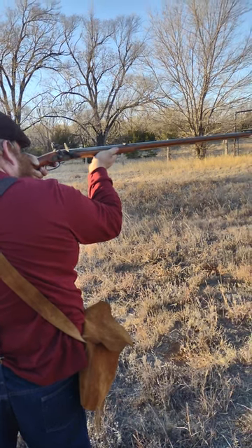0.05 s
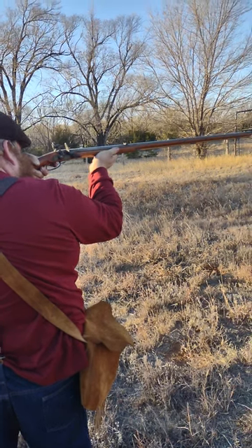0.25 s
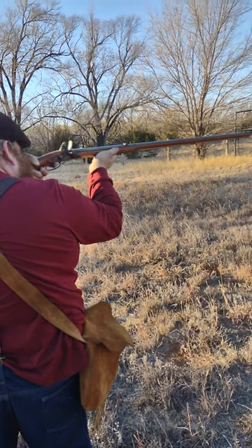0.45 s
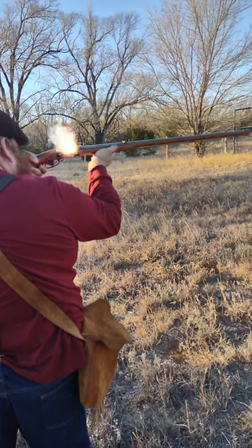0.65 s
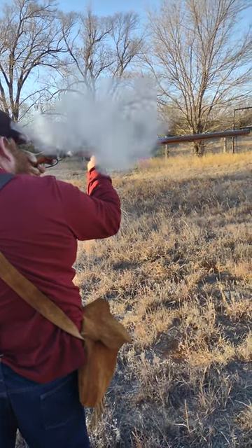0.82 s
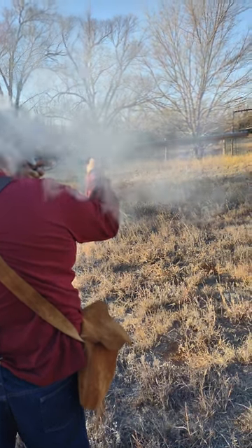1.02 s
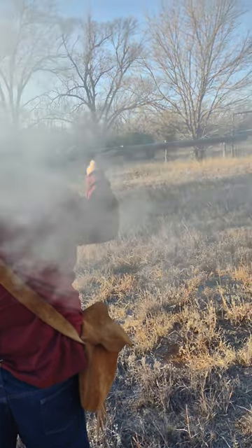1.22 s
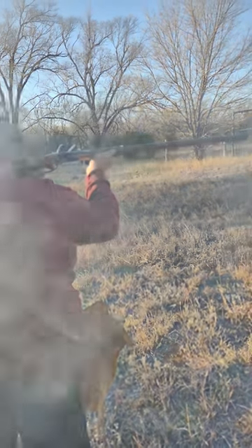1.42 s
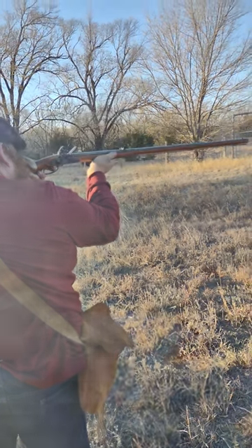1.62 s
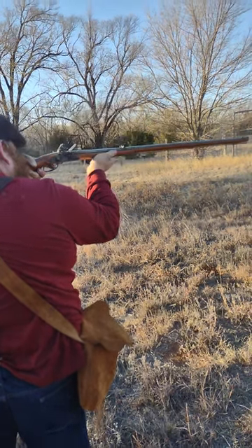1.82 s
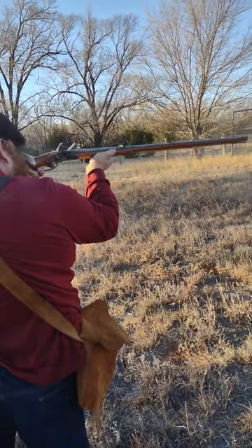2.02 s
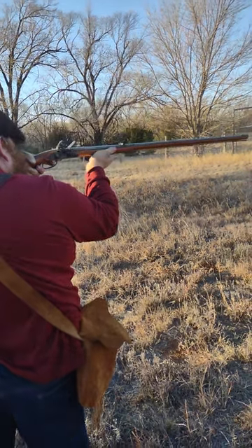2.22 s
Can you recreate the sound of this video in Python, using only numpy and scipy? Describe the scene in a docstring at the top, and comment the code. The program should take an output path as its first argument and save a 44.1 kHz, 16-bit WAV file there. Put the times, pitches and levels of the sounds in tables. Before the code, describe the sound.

One flintlock rifle shot outdoors, after a lock snap and powder flare, with rolling echo.

```python
"""A flintlock rifle is fired in an open field, close to the microphone. Wind rumbles, with one soft bump.
The flint strikes and the lock chatters, each impact exciting the damped modes of steel and wooden stock.
The priming flares and fizzes on; after a short hang the charge catches with a thud, and its pressure
pulse cracks, booms and scatters off the grass. Last, the report rolls back from the tree line, dulled
by absorption in the air, while gusts buffet the microphone."""
import sys
import numpy as np
from scipy import signal
from scipy.io import wavfile
from scipy.ndimage import uniform_filter1d

SR = 44100
rng = np.random.default_rng(int(sys.argv[2]) if len(sys.argv) > 2 else 0)


def log_audio(samples):
    """Write samples as a 16-bit WAV file to the path given in sys.argv[1]."""
    # one column per channel
    frames = np.atleast_2d(samples).T
    # limit to full scale, then quantise
    limited = np.clip(frames, -1, 1)
    pcm = np.round(limited * 32767).astype(np.int16)
    wavfile.write(sys.argv[1], SR, pcm)


N = 103635
T = np.arange(N) / SR

# Spectra give relative level per hertz; pan is left minus right; t60 is the time to fall 60 dB.
# Spectrum of the charge catching: f/Hz, level/dB, pan/dB
THUD_SPECTRUM = [(220, 6, 0), (345, -3, -10.5), (550, -22.5, -6), (1310, -13, -16)]
# Snap and punch of the pressure pulse: f/Hz, level/dB, t60/s, pan/dB
PULSE_MODES = [(4090, -6.5, 0.0052, -19), (1182, -15, 0.07, -2), (361.5, -20.5, 0.13, -7)]
# Spectrum of the crack: f/Hz, level/dB, pan/dB
CRACK_SPECTRUM = [(1290, 1.5, -22), (2170, 1, -30), (3160, -17, -13.5), (4030, -3.5, -24), (6100, -11, -18)]
# The crack and a faint repeat: t/s, level/dB
CRACK_ONSETS = [(1.2574, -13), (1.294, -27.5)]
# Spectrum of the boom: f/Hz, level/dB, pan/dB
BOOM_SPECTRUM = [(180, 5.5, 2), (350, 1, 1), (490, -2, 4.5), (730, 7.5, 2), (1220, -3, -3), (1550, -15, -9),
                 (2610, -14, -14)]
# The boom and its near reflections: t/s, level/dB
BOOM_ARRIVALS = [(1.258, -16), (1.279, -30), (1.332, -32), (1.373, -32)]
# Spectrum of the scatter from near grass: f/Hz, level/dB, pan/dB
GRASS_SPECTRUM = [(186, 7, 0), (456, -6.5, 5), (774, 1.5, 8), (1190, -7, -0.5), (1940, -17, -11.5),
                  (5410, -24, -10)]
# Low flutter of the priming taking fire: f/Hz, level/dB
KINDLE_SPECTRUM = [(60, -5), (130, 8.5), (300, -4), (700, -7), (1400, -21.5), (5000, -33)]
# Spectrum of the flare: f/Hz, level/dB, pan/dB
FLARE_SPECTRUM = [(35.4, -3, -3.5), (63, 6.5, -1.5), (148, -1.5, 4.5), (430, -12, -1), (780, 1, 11.5),
                  (1160, 3, 7.5), (1370, -6, -5), (2020, -6, -9), (2670, -17, -10.5), (4470, -1.5, -14.5),
                  (6035, -20.5, -9)]
# Pops within the flare: t/s, level/dB
FLARE_POPS = [(0.8962, -2), (0.901, -5), (0.928, -15.5)]
# Spectrum of the sputter: f/Hz, level/dB, pan/dB
SPUTTER_SPECTRUM = [(1194, -7, -3), (1740, 0, -18.5), (2185, -20.5, -10)]
# Spectrum of the fizzing powder: f/Hz, level/dB, pan/dB
FIZZ_SPECTRUM = [(50, -2.5, 1.5), (154, 2, -8), (700, -3, 1), (1900, -1.5, -15), (3040, -7, -12.5),
                 (4300, 2, -18), (5402, 1.5, -16.5), (5780, -54, -12.5)]
# Impacts in the lock: t/s, relative tick level/dB, relative knock level/dB
LOCK_IMPACTS = [(0.5298, -4, -12), (0.5454, -12, -8.5), (.549, -7.5, -7), (0.56, -4, -13),
                (0.5725, -14, -13.5), (0.5926, -9, -16), (.602, -10.5, -17.5), (.639, -12, -14),
                (0.648, -9, -21.5), (0.6742, -12.5, -17.5), (.682, -15, -25.5), (0.701, -14, -21),
                (0.709, -15.5, -25.5), (.723, -15, -20), (0.738, -19.5, -26), (0.751, -26, -27.5),
                (0.757, -33.5, -29.5)]
# Spectrum of a tick in the steel: f/Hz, level/dB, pan/dB
TICK_SPECTRUM = [(1640, -22.5, -8), (2345, 1, -5.5), (3000, -19, -11.5), (3510, -2, -10.5),
                 (4680, -0.5, -13), (5900, -14.5, -4)]
# Spectrum of a knock in the stock: f/Hz, level/dB, pan/dB
KNOCK_SPECTRUM = [(170, -4, 3), (410, -16, 3.5), (522, 3.5, 2.5), (712.5, 3.5, 7), (867, -5, 10.5),
                  (1100, -7, 6), (1490, -18, 2.5)]
# Modes of the wooden stock: f/Hz, level/dB, t60/s, pan/dB
WOOD_MODES = [(508, -14.5, 0.13, 5), (735, -21, .08, 11), (845, -23.5, .11, 8)]
# Modes of the steel lock: f/Hz, level/dB, t60/s, pan/dB
METAL_MODES = [(2580, -30, 0.023, -7), (3640, -22, 0.075, -0.5), (4364, -2.5, 0.023, -20),
               (4920, -21, 0.05, -15.5)]
# Spectrum of the rolling echo before air absorption: f/Hz, level/dB, pan/dB
ROLL_SPECTRUM = [(70, -14, -2), (202.4, -4, -2.5), (700, -3, 4), (1200, -11.5, 4.5), (1590, -15.5, -15.5),
                 (2400, -24.5, -14.5), (5500, -27, -4)]
# Envelope of the rolling echo before air absorption: t/s, level/dB
ROLL_ENVELOPE = [(1.3, -41), (1.55, -45), (1.657, -37.5), (1.672, -35), (1.9, -36.5), (2.18, -34),
                 (2.35, -38.5)]
# Spectrum of the distinct echoes: f/Hz, level/dB, pan/dB
ECHO_SPECTRUM = [(59.8, -13, 2.5), (141.4, 2.5, 0), (239, -2.5, -0.5), (404, -9, 0.5), (700, -16, -2.5),
                 (1310, -35, -20), (2500, -59.5, -14)]
# Distinct echoes: t/s, level/dB, tilt/(dB per octave)
ECHO_ARRIVALS = [(1.669, -46.5, 10.5), (1.816, -43, 4.5), (2.012, -28.5, 0.5), (2.075, -26.5, 1.5),
                 (2.149, -33, 3)]
# Spectrum of the wind rumble: f/Hz, level/dB
WIND_SPECTRUM = [(20, 2.5), (32, 5.5), (55, -7), (100, -24.5), (200, -44), (400, -70.5)]
# Wind on the left microphone port: t/s, level/dB
LEFT_WIND = [(0, -43), (.33, -21.5), (.5, -35.5), (.8, -36.5), (1.05, -48.5), (1.58, -47.5), (1.71, -23.5),
             (1.8, -27), (1.94, -48), (2.35, -50.5)]
# Wind on the right microphone port: t/s, level/dB
RIGHT_WIND = [(0, -31), (.33, -25), (.48, -39), (.8, -41.5), (1.34, -58), (1.41, -37.5), (1.53, -29.5),
              (1.58, -13.5), (1.8, -23), (1.97, -26.5), (2.35, -27)]
# Gusts on the right port: t/s, level/dB
RIGHT_GUSTS = [(1.548, -8), (1.614, -11), (1.68, -9.5), (1.773, -13.5), (1.83, -8.5), (1.915, -16.5)]
# Spectrum of the quiet field: f/Hz, level/dB
AMBIENT_SPECTRUM = [(60, 3), (400, -15.5), (800, -23.5), (1300, -38.5), (5200, -33)]

SHOT_S = 1.259


def shot():
    """Blast wave: the charge thuds, then its pressure pulse rings, cracks, booms and scatters off grass."""
    thud = swell(1.219, rise=0.0061, hold=0.011, t60=0.026)
    times, crack_db = np.transpose(CRACK_ONSETS)
    booms = sum(from_db(db) * swell(t, rise=0.026, hold=0.0055, t60=0.059) for t, db in BOOM_ARRIVALS)
    scatter = swell(SHOT_S, rise=0.15, hold=0.18, t60=0.083, sag=60 / 0.76)
    return (from_db(-20) * band_noise(THUD_SPECTRUM, lambda hz: thud)
            + struck(PULSE_MODES, np.array([SHOT_S]), 0)
            + band_noise(CRACK_SPECTRUM, lambda hz: decays(times + lag(hz), crack_db, t60=0.04))
            + band_noise(BOOM_SPECTRUM, lambda hz: np.interp(T - lag(hz), T, booms))
            + from_db(-26) * band_noise(GRASS_SPECTRUM, lambda hz: scatter))


def priming():
    """Combustion noise: the powder kindles, flares with a puff and pops, sputters once and fizzes away."""
    flare_s, rise_s, hold_s = 0.8929, 0.073, 0.048
    kindle = swell(0.895, rise=0.22, hold=hold_s, t60=0.35)
    flame = from_db(-11.5) * swell(flare_s, rise_s, hold=hold_s, t60=0.1, sag=70)
    pops = decays(*np.transpose(FLARE_POPS), t60=0.036)
    flare = np.hypot(flame, pops)
    sputter = swell(1, rise_s, t60=0.072)
    fizz = swell(flare_s, rise_s, t60=0.82)
    return (from_db(-28.5) * band_noise(KINDLE_SPECTRUM, lambda hz: kindle)
            + band_noise(FLARE_SPECTRUM, lambda hz: np.interp(T - 0.16 * lag(hz), T, flare), 0.15)
            + pressure_swing(0.904, db=-15.5, hz=34.8, width_s=0.027)
            + from_db(-22.5) * band_noise(SPUTTER_SPECTRUM, lambda hz: sputter)
            + from_db(-19) * band_noise(FIZZ_SPECTRUM, lambda hz: fizz, correlation=0.07))


def lock():
    """Impact excitation: the cock swings, then each contact ticks, knocks and rings steel and wood."""
    times, tick_db, knock_db = np.transpose(LOCK_IMPACTS)
    swing = from_db(-42) * swell(0.514, rise=0.025, hold=0.014, t60=0.025)
    shimmer = from_db(-41.5) * decays(times, tick_db, t60=0.95) + swing
    ticks = lambda hz: decays(times + lag(hz), tick_db - 3.5, t60=0.025)
    knocks = lambda hz: decays(times + lag(hz), knock_db - 2, t60=0.071)
    knock_rise = int(0.003 * SR)
    return (band_noise(TICK_SPECTRUM, lambda hz: ticks(hz) + shimmer)
            + band_noise(KNOCK_SPECTRUM, lambda hz: uniform_filter1d(knocks(hz), knock_rise) + shimmer)
            + struck(WOOD_MODES, times, 0.57 * knock_db)
            + struck(METAL_MODES, times, tick_db))


def tree_line():
    """Reflection and air absorption: the roll dulls as it travels, and a few distinct echoes return."""
    loss_db_per_khz_s, pivot_hz, rise_s = 11.5, 198, 0.0086
    roll = contour(ROLL_ENVELOPE) * swell(SHOT_S, rise=0.022, hold=T[-1], t60=1)
    travel_s = np.maximum(T - SHOT_S, 0)
    absorbed_roll = lambda hz: roll * from_db(-loss_db_per_khz_s * travel_s * hz / 1000)
    times, db, tilt = np.transpose(ECHO_ARRIVALS)
    bursts = np.array([swell(t, rise_s, t60=0.14) for t in times])
    tails = from_db(-9.5) * np.array([swell(t, rise_s, t60=1.28) for t in times])
    echoes = lambda hz: np.sqrt(from_db(db + tilt * np.log2(hz / pivot_hz)) ** 2 @ (bursts + tails) ** 2)
    return band_noise(ROLL_SPECTRUM, absorbed_roll) + band_noise(ECHO_SPECTRUM, echoes)


def wind():
    """Turbulence: each port rumbles on its own; stronger wind has finer eddies and sounds brighter."""
    knee_db, corner_hz = -27.5, 45
    gusts = sum(from_db(db) * swell(t, rise=0.043, t60=0.2) for t, db in RIGHT_GUSTS)
    port_db = 20 * np.log10([contour(LEFT_WIND), np.hypot(contour(RIGHT_WIND), gusts)])
    tilt = np.maximum(0.59 * (port_db - knee_db), -6.5)   # dB per octave above the corner
    rumble = lambda hz: from_db(port_db + tilt * np.clip(np.log2(hz / corner_hz), 0, 2))
    left_bump = pressure_swing(0.341, db=-19.5, hz=86, width_s=0.0067) * np.array([[1], [0]])
    return band_noise(WIND_SPECTRUM, rumble, correlation=0) + left_bump


def quiet_field():
    """Stationary noise: a faint, low background, almost uncorrelated between left and right."""
    return from_db(-57.5) * band_noise(AMBIENT_SPECTRUM, lambda hz: 1, correlation=0.043)


def band_noise(spectrum, envelope, correlation=0.43):
    """Superposition: stereo noise bands share unit power, then each is shaped by envelope(hz) and placed."""
    table = np.array(spectrum, float)
    edges = np.r_[np.geomspace(16, 400, 9), np.geomspace(480, 6800, 19)]
    centres = np.sqrt(edges[1:] * edges[:-1])
    at_centres = lambda column: np.interp(np.log(centres), np.log(table[:, 0]), column)
    octaves_outside = np.abs(np.log2(centres / np.clip(centres, table[0, 0], table[-1, 0])))
    gains = from_db(at_centres(table[:, 1]) - 30 * octaves_outside) * np.sqrt(np.diff(edges))
    gains /= np.linalg.norm(gains)
    pans = at_centres(table[:, 2]) if table.shape[1] > 2 else 0 * centres
    white = rng.standard_normal((2, 2, N + SR // 4))   # adjacent bands take independent noise
    mid = np.sqrt((1 + correlation) / 2) * white[:, :1]
    side = np.sqrt((1 - correlation) / 2) * white[:, 1:] * [[1], [-1]]
    out = np.zeros((2, N))
    for k in np.flatnonzero(gains > 1e-4):
        bandpass = signal.butter(3, edges[k:k + 2], "band", fs=SR, output="sos")
        band = signal.sosfilt(bandpass, mid[k % 2] + side[k % 2])[:, -N:]
        band /= band.std(axis=1, keepdims=True)
        out += gains[k] * placed(band * envelope(centres[k]), centres[k], pans[k])
    return out


def struck(modes, times, db):
    """Modal response: every blow excites each damped sinusoid with a slightly random strength."""
    strengths = from_db(np.reshape(db, (-1, 1)) + rng.normal(0, 2, (len(times), len(modes))))
    out = 0
    for k, (hz, level_db, t60, pan_db) in enumerate(modes):
        radius, angle = from_db(-60 / (t60 * SR)), 2 * np.pi * hz / SR
        feedback = [1, -2 * radius * np.cos(angle), radius ** 2]
        blows = impulses(times + lag(hz), strengths[:, k])
        mode = from_db(level_db) * signal.lfilter([0, np.sin(angle)], feedback, blows)
        out = out + placed([mode, mode], hz, pan_db)
    return out


def placed(stereo, hz, pan_db):
    """Localisation cues: a level difference and, above the bass, up to 1 ms of delay on the left."""
    delay_s = np.interp(hz, [350, 900], [0, 0.001])
    gains = from_db(np.array([[pan_db], [-pan_db]]) / 2)
    gains /= np.sqrt(np.mean(gains ** 2))
    return gains * np.array([np.interp(T - delay_s, T, stereo[0]), stereo[1]])


def lag(hz):
    """Dispersion: the delay in seconds of a blow's lows behind its highs."""
    top_hz = 5625
    return 0.003234 * (np.sqrt(top_hz / np.clip(hz, 500, top_hz)) - 1)


def swell(peak_s, rise, t60, hold=0, sag=0):
    """Exponential growth and decay: up 60 dB in the rise, a hold sagging in dB/s, then a fall; times in s."""
    t = T - peak_s
    db = 60 * np.minimum(t, 0) / rise - sag * np.clip(t, 0, hold) - 60 * np.maximum(t - hold, 0) / t60
    return from_db(np.maximum(db, -200))


def decays(times, db, t60):
    """Incoherent addition: the envelope of blows whose energies add and die away."""
    retained = from_db(-120 / (t60 * SR))
    energy = signal.lfilter([1], [1, -retained], impulses(times, from_db(db) ** 2))
    return np.sqrt(energy)


def pressure_swing(centre_s, db, hz, width_s):
    """Wave packet: a few slow cycles of pressure under a Gaussian envelope."""
    t = T - centre_s
    return -from_db(db) * np.cos(2 * np.pi * hz * t) * np.exp(-0.5 * (t / width_s) ** 2)


def impulses(times, sizes):
    """Ideal impacts, each one sample long."""
    return np.bincount((times * SR).astype(int), sizes, N)[:N] + 1e-18


def contour(points):
    """Amplitude envelope, linear in decibels between points."""
    return from_db(np.interp(T, *np.transpose(points)))


def from_db(db):
    """Amplitude ratio of a level in decibels."""
    return 10 ** (np.asarray(db) / 20)


def scene():
    """Superposition: lock, priming, shot and echo add to the wind and the quiet of the field."""
    return lock() + priming() + shot() + tree_line() + wind() + quiet_field()


def record(dry):
    """Band limiting and saturation: the treble ends steeply and peaks are rounded."""
    treble_edge_hz, cutoff_hz = 5687, 6481
    limited = signal.sosfilt(signal.butter(24, treble_edge_hz, fs=SR, output="sos"), dry)
    rounded = limited / (1 + np.abs(limited) ** 3) ** (1 / 3)
    return signal.sosfilt(signal.butter(8, cutoff_hz, fs=SR, output="sos"), rounded)


dry = scene()
out = record(dry)
log_audio(out)
```